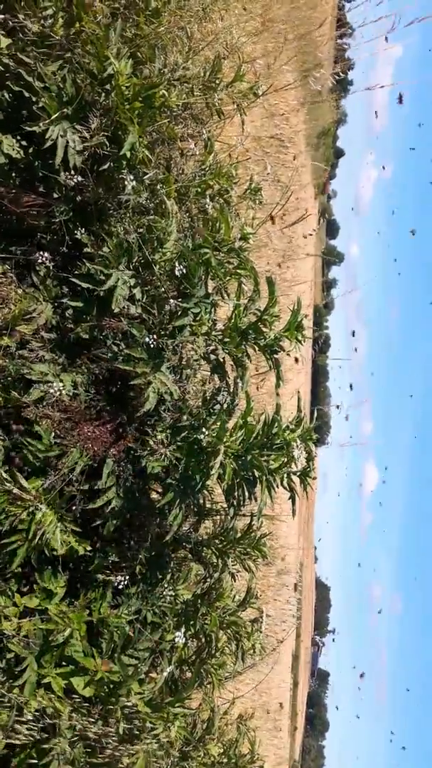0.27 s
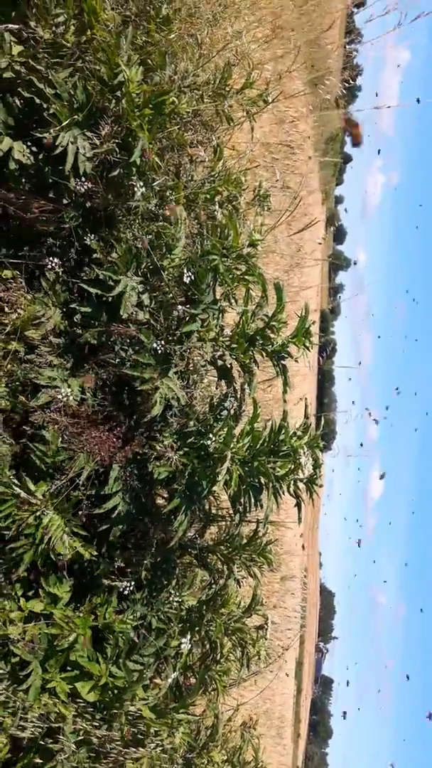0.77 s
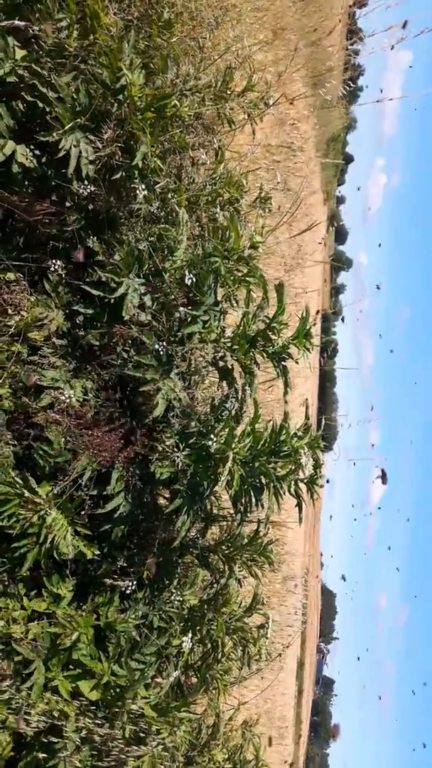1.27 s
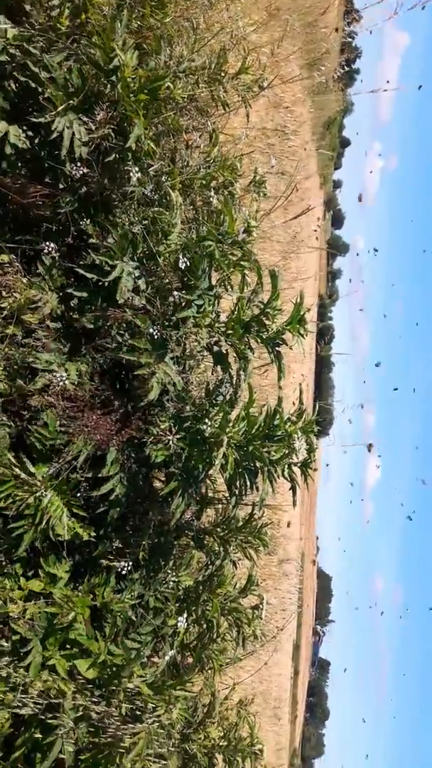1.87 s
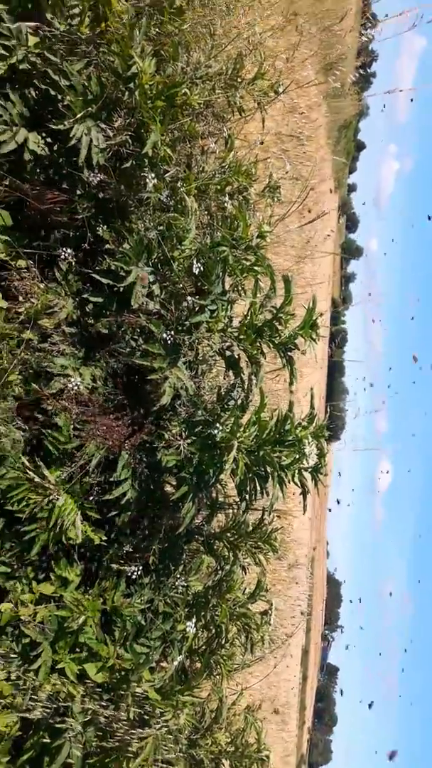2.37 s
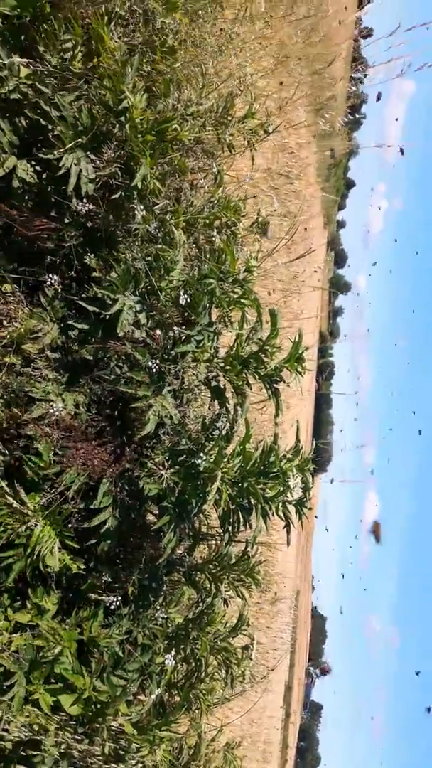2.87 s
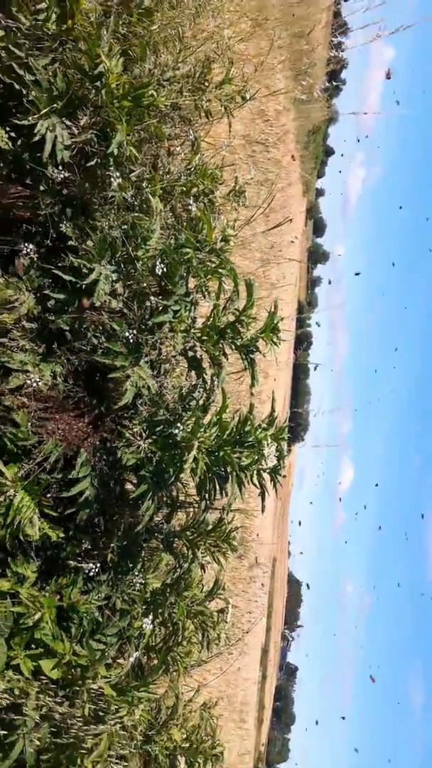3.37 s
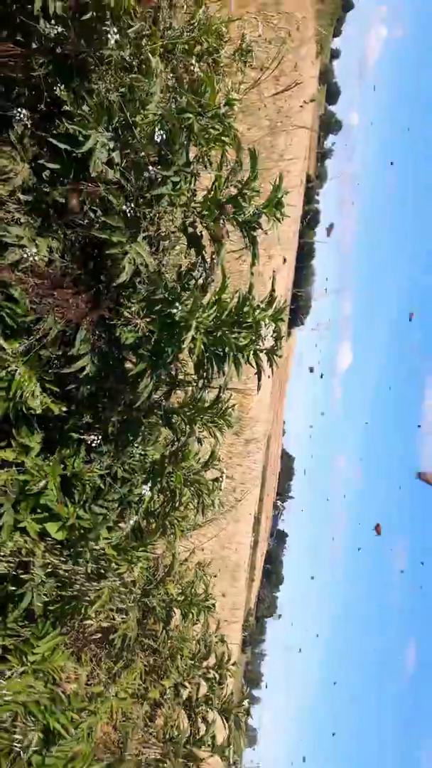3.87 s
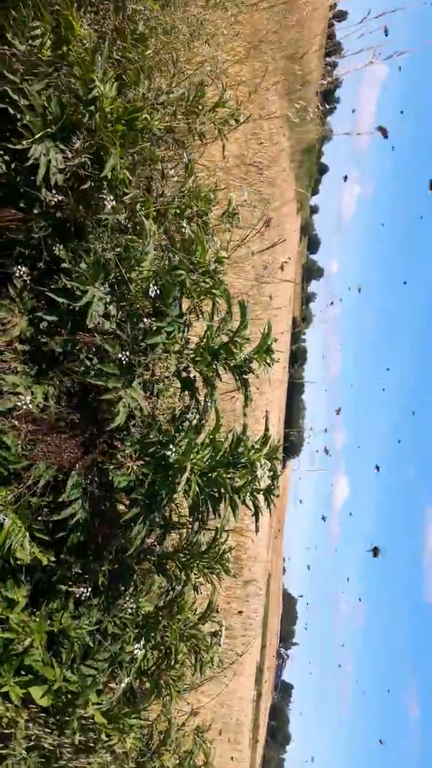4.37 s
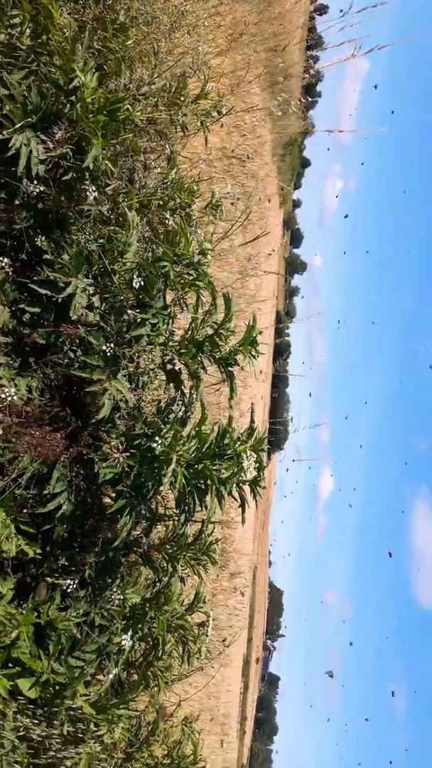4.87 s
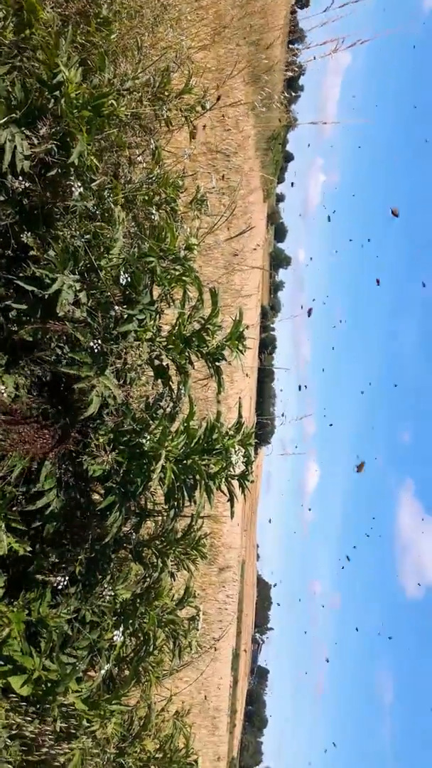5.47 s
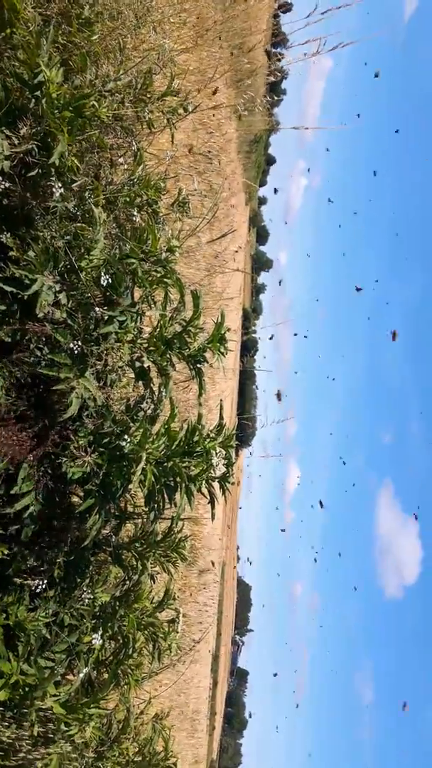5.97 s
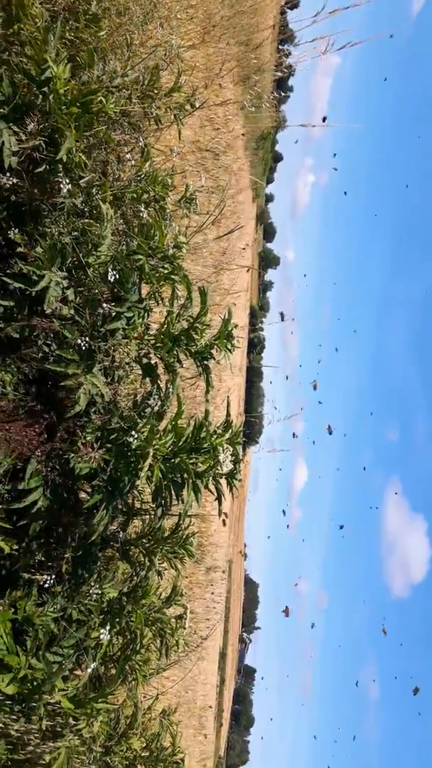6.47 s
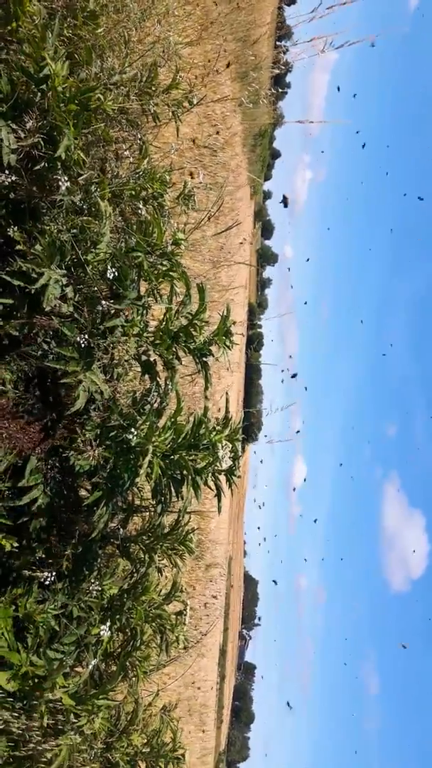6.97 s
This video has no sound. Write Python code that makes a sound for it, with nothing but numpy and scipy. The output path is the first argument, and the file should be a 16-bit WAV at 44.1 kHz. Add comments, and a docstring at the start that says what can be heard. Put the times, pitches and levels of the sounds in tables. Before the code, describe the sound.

Dozens of bees hum together as one wavering low drone in an open field, over faint leaf rustle, hiss and light wind. After about a second and a half, fingers scrape the phone's case, then hard plastic snaps and creaks crowd together, ending with a strong knock near four seconds. The buzz continues, with dull bumps and a small clatter just before six seconds. Handling is right at the microphone.

```python
"""A honeybee swarm fills the air over a meadow: 40 wandering wingbeats near 240 Hz blend into one drone.
At the microphone, a hand holds the phone: fingers rub the case in strokes of many tiny slips that ring it,
the case creaks and snaps as struck modes with a burst of noise, and the grip thumps as short dying sines.
Behind them lie shaped noises: far leaves and grass, the microphone's own hiss and wind on its port."""
import sys
import numpy as np
from scipy import signal
from scipy.fft import rfft, irfft, next_fast_len
from scipy.io import wavfile
from scipy.ndimage import uniform_filter1d

SR = 44100
rng = np.random.default_rng(int(sys.argv[2]) if len(sys.argv) > 2 else 0)


def wav_out(sig):
    """Save sig, one row per channel (or a flat mono array), as 16-bit PCM at SR to the path in sys.argv[1]."""
    wavfile.write(sys.argv[1], SR, np.round(np.clip(np.atleast_2d(sig).T, -1, 1) * 32767).astype(np.int16))


N = 318843   # samples, about 7.2 s

# Harmonics of one wingbeat: (multiple of the beat [1], level [dB])
WINGBEAT_HARMONICS = [(1, -3.5), (2, -3.5), (3, -15), (4, -15), (5, -17), (6, -28), (7, -41), (8, -55.5),
                      (9, -56), (10, -56)]
# Modes of the phone case: (pitch [Hz], level [dB], t60 before each contact shortens it [s])
CASE_MODES = [(360.5, -4, 0.044), (588, -0.5, 0.011), (1000, -0.5, 0.015), (1372, 6, 0.0068),
              (1683, 2, 0.011), (1924, 5, 0.0093), (2354, 5, 0.005), (2860, 1, 0.0056), (3620, 2.5, 0.0038),
              (4200, -3, 0.0027), (5485, 5, 0.0026), (5775, 6, 0.0025), (6580, -2.5, 0.002),
              (7600, -3, 0.0012), (9400, -30, 0.0007)]
# Finger strokes on the case: (start [s], firmest after [s], length [s], nominal level [dB],
# upper modes [dB re lower], direct treble [dB re stroke])
FINGER_STROKES = [(1.765, 0.18, 0.25, -34.5, -1.5, -26), (2.017, 0.067, 0.24, -33, -1, -27),
                  (2.067, 0.034, 0.1, -25, 2, -15.5), (2.275, 0.079, 0.24, -49, -3, -22),
                  (2.5, .06, 0.15, -57, -5, -23), (2.618, 0.061, 0.098, -35.5, -8, -26),
                  (2.742, .04, 0.082, -46, -1, -25), (2.85, .07, 0.1, -44, -2, -32),
                  (2.97, 0.1, 0.18, -43, -5, -20), (3.132, .03, 0.17, -41.5, -5, -17),
                  (3.246, 0.12, 0.22, -41.5, -4, -16), (3.444, 0.086, 0.18, -42.5, -5, -13.5),
                  (3.598, 0.035, 0.21, -41.5, -3, -20), (3.781, 0.055, 0.16, -33.5, -6, -23.5),
                  (3.934, .04, 0.087, -46, -1, -21), (4.067, .04, 0.069, -36.5, -11, -24),
                  (4.167, .04, 0.1, -29.5, -5.5, -34)]
# Snaps of the case: (time [s], nominal strike [dB], pitch that rings most [Hz],
# upper modes [dB re strike], crack [dB re strike])
CASE_SNAPS = [(1.525, -32, 890, -10, -25), (1.992, -8, 1280, -3, -35), (2.011, -15, 1360, -8, -38),
              (2.19, -23, 1540, -4, -22), (2.212, -38, 1930, 9, -4), (2.234, -21, 2200, 16.5, -12),
              (2.241, -9.5, 2240, 5.5, -11), (2.375, -32, 1320, 1, -30), (2.41, -36, 2000, 9, -12),
              (2.467, -33.5, 1020, 5, -22), (2.495, -26, 1000, -18, -30), (2.531, -18, 600, -22, -34),
              (2.562, -23.5, 1410, -14, -31), (2.578, -19.5, 1100, -17, -28), (2.6, -23, 1800, -12, -35),
              (2.614, -5.5, 625, -9.5, -22.5), (2.631, -6, 694, -8, -24), (2.748, -22, 1520, -10, -27),
              (2.753, -22, 1010, -14, -27), (2.771, -10.5, 594, -7, -23), (2.806, -25.5, 1570, -6, -15),
              (2.834, -16.5, 606, -13, -26), (2.838, -23, 2030, -5, -19), (2.844, -4.5, 1090, -6, -26),
              (2.866, -21.5, 724, -4, -24), (2.929, -14.5, 2200, -7, -12), (2.952, -26, 1890, -11, -23),
              (2.966, -25.5, 2170, -6, -18), (2.992, -28, 2230, -6, -13), (3.002, -28, 1040, 1.2, -9),
              (3.041, -13, 2060, -11, -21), (3.059, -12.5, 1950, -9, -15), (3.077, -15, 1420, -7, -21),
              (3.086, -27, 993, -5, -14), (3.093, -15.5, 1360, -6, -11), (3.111, -18, 830, -14, -17),
              (3.152, -20.5, 1580, -5, -23), (3.161, -11.5, 1760, 4, -15), (3.17, -9, 1600, 2.5, -11),
              (3.176, -23, 1470, -5, -15), (3.187, -12.5, 624, -11, -21), (3.202, -33, 1890, 10, -16),
              (3.215, -14.5, 3950, 8, -4), (3.266, -19, 1090, 8, -6), (3.288, -7, 940, 4, -9.5),
              (3.31, -30, 1520, 11, 5), (3.353, -23, 1380, -6, 0.5), (3.369, -24, 1470, -6, -16),
              (3.427, -28, 1050, 1, -21), (3.482, -26.5, 1500, 4, -2.5), (3.541, -16, 990, -8.5, -28),
              (3.611, -25, 1240, -4, -15), (3.697, -27, 1090, 5, -18), (3.739, -25.5, 2160, -1, -24),
              (3.764, -28, 999, 0, -24), (3.925, -26, 1430, -16, -30), (4.078, -14, 603, -21, -17),
              (4.082, -20.5, 1400, -5, -15), (4.093, -12.5, 1700, -7, -6), (4.106, -13, 1640, -0.5, -3),
              (4.155, -13, 1030, 0, -17), (4.175, -16.5, 1110, -8, -28), (4.18, -22, 1200, -2, -26),
              (5.855, -20.5, 587, -24, -43), (5.87, -23.5, 977, -9, -37), (5.895, -15, 2070, -2.5, -40),
              (5.927, -28, 970, -7, -26)]
# Thumps of the grip: (time [s], peak before the bass cut [dB], pitch [Hz], t60, at least 0.01 [s])
GRIP_THUMPS = [(2.239, -33, 118, 0.018), (2.49, -35, 126, 0.059), (2.532, -24, 397, 0.014),
               (2.56, -31, 130, 0.095), (2.614, -28, 129, .06), (2.633, -28, 300, 0.041),
               (2.771, -29, 134, 0.084), (2.848, -24.5, 220, .03), (3.075, -37, 153, 0.04),
               (3.111, -24.5, 302, 0.0083), (3.161, -18.5, 438, 0.011), (3.185, -25, 148, 0.009),
               (3.288, -28.5, 210, 0.035), (3.371, -20, 364, 0.011), (3.49, -32.5, 165, 0.036),
               (3.758, -34.5, 107, 0.075), (3.93, -39, 130, 0.046), (4.088, -26, 146, 0.075),
               (4.155, -5.5, 386, 0.017), (4.157, -23, 124, 0.034), (5.39, -29.5, 89, 0.081),
               (5.568, -38, 90, 0.075), (5.699, -35, 91.5, 0.088), (5.859, -12, 112, 0.0082),
               (5.956, -23.5, 95, 0.021), (5.994, -29, 102, 0.033), (6.019, -19.5, 88, 0.048),
               (6.038, -25, 224, 0.018), (6.42, -38, 110, .05)]
# The backdrop's levels rise and fall over time, the wind gusts:
# (time [s], leaf rustle [dB], hiss before its top is cut [dB], wind before its lumps [dB])
BACKDROP_LEVELS = [(0, -53.5, -60.5, -54), (.62, -52.5, -60, -55), (1.3, -53, -59.5, -58),
                   (1.6, -50.5, -58.5, -55.5), (2.3, -45, -56.5, -57), (2.66, -42, -57, -46.5),
                   (3.3, -46.5, -61, -52.5), (3.8, -39.5, -55.5, -47), (4.2, -46, -54, -46.5),
                   (4.5, -46.5, -57, -55), (5, -46.5, -56.5, -55), (5.5, -47, -57.5, -53),
                   (5.92, -46.5, -57, -46), (6.1, -48, -58, -54.5), (7.23, -47, -58.5, -56)]
# Far leaves and grass: (frequency [Hz], relative density [dB per Hz])
RUSTLE_SPECTRUM = [(250, -7), (380, 1), (600, -2.5), (1200, -0.5), (2200, -8), (3500, -23), (4600, -31.5),
                   (6000, -33), (9500, -45), (14000, -59)]
# The microphone's own hiss: (frequency [Hz], relative density [dB per Hz])
HISS_SPECTRUM = [(3000, -2.5), (5000, -8), (9000, -12), (10500, -7.5), (12500, -1), (14000, -3),
                 (15500, -1), (17000, 11)]
# Wind on the microphone port: (frequency [Hz], relative density [dB per Hz])
WIND_SPECTRUM = [(15, -23), (38, -11), (60, -3.5), (85, 1), (130, -4), (170, 2), (300, -9), (900, -51)]

WING_HZ, WING_SPREAD = 236.6, .105   # middle wingbeat, spread between bees in log frequency
SWARM_DB, SWARM_SWELL_DB = -40.5, 1.0   # level of the cloud of bees, and how much it swells as they wheel about
UPPER_HZ = 4600   # case modes above this count as upper
TOUCH_S, LIFT_S = 0.011, 0.034   # a stroke lands and lifts
PRESS_DB_PER_S, EASE_DB_PER_S = 45, 46   # it firms up to its firmest moment, then eases
TICKS_FROM_S, TICKS_TO_S, TICKS = 2.3, 3.5, 12   # fainter snaps fall at random while the grip shifts
TICK_DB, TICK_SPREAD_DB = -36, 3   # nominal strike and its spread
TICK_HZ, TICK_UPPER_DB, TICK_CRACK_DB = 1300, 1, -18   # middle values, scattered from tick to tick
HISS_TOP_HZ, CUTOFF_HZ = 15720, 17100   # edges of the hiss and of the whole sound


def amp(db):
    """Decibels to gain."""
    return 10 ** (np.asarray(db) / 20)


def rms_one(x):
    """Scale to unit rms."""
    return x / np.sqrt(np.mean(x ** 2, axis=-1, keepdims=True) + 1e-20)


def drift(rate_hz, count=1, size=N, step=1):
    """Slow chance, spread 1: count rows of size points, step samples apart."""
    hop = 64 // step   # points between slow values
    r = np.exp(-128 * np.pi * rate_hz / SR)
    noise = rng.standard_normal((count, size // hop + 1502))
    slow = signal.lfilter([1], [1, -2 * r, r * r], noise)[:, 1500:]   # drop the filter's start
    at = np.arange(size) / hop
    return np.array([np.interp(at, np.arange(len(row)), row) for row in rms_one(slow)])


def swarm(level_db, count, wander, pass_db):
    """Every bee beats at its own wandering rate and swells as it flies past; built at a quarter of the rate."""
    size = N // 4 + 1
    beat = np.arange(8192) / 8192   # one wingbeat cycle
    fundamental, *overtones = (amp(db) * np.sin(2 * np.pi * k * beat + k * k)
                               for k, db in WINGBEAT_HARMONICS)
    own = np.arctanh(np.linspace(-.85, .85, count))[:, None]   # most near the middle, a few far off
    wandering = wander * drift(1.5, count=count, size=size, step=4)   # turns and Doppler
    hz = WING_HZ * np.exp(WING_SPREAD * own + wandering)
    phase = np.cumsum(hz * 4 / SR, axis=1) + rng.random((count, 1))
    at = (phase * len(beat)).astype(int) % len(beat)
    nearness = amp(0.1 * own + pass_db * drift(4.4, count=count, size=size, step=4))
    hardness = amp(1.65 * own)   # faster wings sound harder
    bees = nearness * (fundamental[at] + hardness * sum(overtones)[at])
    cloud = signal.resample_poly(np.sum(bees, axis=0), up=4, down=1)[:N]
    loudness = np.sqrt(uniform_filter1d(cloud ** 2, size=SR // 3))
    return amp(level_db) * cloud / loudness   # the crowd as a whole keeps its loudness


def ring(clicks, hz, t60):
    """A unit click sets a dying sine, of height about 1, ringing."""
    r, w = amp(-60 / (t60 * SR)), 2 * np.pi * hz / SR
    return signal.lfilter([0, np.sin(w)], [1, -2 * r * np.cos(w), r * r], clicks + 1e-18)


def crack(x, edge_hz):
    """The part of a contact that reaches the port directly: treble only."""
    return signal.sosfilt(signal.butter(2, edge_hz, "high", fs=SR, output="sos"), x)


def rubbing(slips_per_s, uneven_db):
    """Skin slips on the case thousands of times a second; each slip rings the case."""
    sizes = amp(uneven_db * np.minimum(rng.exponential(1, N), 5)) * rng.choice([-1, 1], N)
    slipping = rng.random(N) < slips_per_s / SR
    slips = sizes * slipping * amp(2.0 * drift(67)[0])
    modes = np.zeros((2, N))   # lower, upper
    for k, (hz, db, t60) in enumerate(CASE_MODES):
        is_upper = int(hz > UPPER_HZ)
        sign = (-1) ** (k + is_upper)   # lower and upper modes cancel between them and leave a notch
        modes[is_upper] += sign * amp(db) * ring(slips, hz, 0.95 * t60)
    modes = modes / modes.sum(axis=0).std()
    light_touch = signal.butter(2, 800, "high", fs=SR, output="sos")   # leaves the low modes still
    lower, upper = signal.sosfilt(light_touch, modes)
    scrape = signal.lfilter([1], [1, -.7], slips * rng.choice([-1, 1], N))
    treble = rms_one(crack(scrape, edge_hz=3800))
    out, t = 0, np.arange(N) / SR
    for start, rise, length, level_db, upper_db, treble_db in FINGER_STROKES:
        firmest, end = start + rise, start + length
        touching = np.clip(np.minimum((t - start) / TOUCH_S, (end - t) / LIFT_S), 0, 1)
        eased_db = np.maximum(PRESS_DB_PER_S * (firmest - t), EASE_DB_PER_S * (t - firmest))
        pressure = touching * amp(level_db - eased_db)
        out = out + pressure * (lower + amp(upper_db) * upper + amp(treble_db) * treble)
    return out


def ticks():
    """Faint snaps at random moments, as rows like those of the loud ones."""
    when = rng.uniform(TICKS_FROM_S, TICKS_TO_S, TICKS)
    how = rng.standard_normal((TICKS, 4))
    return [(s, TICK_DB + TICK_SPREAD_DB * a, TICK_HZ * np.exp(0.64 * b), TICK_UPPER_DB + 5 * c, TICK_CRACK_DB + 5 * d)
            for s, (a, b, c, d) in zip(when, how)]


def snaps(fall_db):
    """Each snap strikes every mode, the lower ones most near the pitch the grip leaves free, fall_db less an octave away."""
    s, strike_db, pitch, upper_db, crack_db = np.transpose(list(CASE_SNAPS) + ticks())
    chance = rng.standard_normal((len(s), len(CASE_MODES) + 2))
    at = np.round(s * SR + 40 + 8 * chance[:, -1]).astype(int)
    gap_s = 0.002206 * np.exp(.25 * chance[:, -2])
    again = at + np.round(SR * gap_s).astype(int)   # the seam lets go twice
    out, clicks = 0, np.zeros(N)
    for k, (hz, db, t60) in enumerate(CASE_MODES):
        is_upper = hz > UPPER_HZ
        share_db = upper_db if is_upper else -fall_db * np.abs(np.log2(hz / pitch))
        clicks[at] = amp(strike_db + db - 5 + share_db + 2.0 * chance[:, k])
        second_clicks = amp(-10.5) * np.bincount(again, clicks[at], N)
        sign = (-1) ** k if is_upper else -(-1) ** (k // 2)
        out = out + sign * ring(clicks + second_clicks, hz, 0.84 * t60)
    blunt = signal.butter(2, [300, 7000], "band", fs=SR, output="sos")   # a blunt, brief contact
    out = signal.sosfilt(blunt, out)
    clicks[at] = amp(strike_db + crack_db)
    fade = signal.lfilter([1], [1, -np.exp(-1 / 17.4)], clicks)   # a crack lasts about a millisecond
    burst = rng.standard_normal(N) * fade
    return out + crack(signal.lfilter([1], [1, -.5], burst), edge_hz=3200)


def thumps():
    """A soft push rocks the phone: a sine that starts gently and dies away."""
    out, t = np.zeros(N + SR), np.arange(SR // 4) / SR
    for s, peak_db, hz, t60 in GRIP_THUMPS:
        onset = 1 - np.exp(-t / 0.0021)
        swing = np.sin(2 * np.pi * hz * t) * amp(-60 * t / max(t60, .01)) * onset
        out[round(s * SR):][:len(t)] += amp(peak_db) * swing / np.abs(swing).max()
    return out[:N]


def in_time(rows):
    """Columns of a table as curves over every sample."""
    s, *columns = np.transpose(rows)
    return [np.interp(np.arange(N) / SR, s, c) for c in columns]


def coloured(spectrum, x):
    """Shape a signal by a spectrum drawn on log frequency; rms 1."""
    size = next_fast_len(N)
    hz, db = np.transpose(spectrum)
    log_hz = np.log(np.arange(1, size // 2 + 2) * SR / size)
    gain = amp(np.interp(log_hz, np.log(hz), db, -90, -90))
    return rms_one(irfft(rfft(x, size) * gain, size)[:N])


def breeze(rustle_db, hiss_db, wind_db):
    """Far leaves and grass, the microphone's own hiss and lumpy wind on the port: three shaped noises."""
    white = rng.standard_normal((3, N))
    rustle = amp(rustle_db) * coloured(RUSTLE_SPECTRUM, white[0])
    hiss_top = signal.ellip(8, .5, 50, HISS_TOP_HZ, fs=SR, output="sos")
    hiss = amp(hiss_db) * signal.sosfilt(hiss_top, coloured(HISS_SPECTRUM, white[1]))
    lumps_db = 1.8 * drift(8)[0]
    wind = amp(wind_db + lumps_db) * coloured(WIND_SPECTRUM, white[2])
    return rustle + hiss + wind


def scene():
    """Swarm, handling and air at one microphone."""
    swarm_db = SWARM_DB + SWARM_SWELL_DB * drift(2.6)[0]
    bees = swarm(swarm_db, count=40, wander=.035, pass_db=3.0)
    air = breeze(*in_time(BACKDROP_LEVELS))
    hand = rubbing(slips_per_s=6500.0, uneven_db=1.5) + snaps(fall_db=7.0) + thumps()
    bass_cut = signal.butter(2, 65, "high", fs=SR, output="sos")   # handling sounds have little deep bass
    return (bees + air + signal.sosfilt(bass_cut, hand))[None]


def record(dry):
    """The top is cut steeply."""
    return signal.sosfilt(signal.cheby2(12, 70, CUTOFF_HZ, fs=SR, output="sos"), dry)


dry = scene()
out = record(dry)
wav_out(out)
```